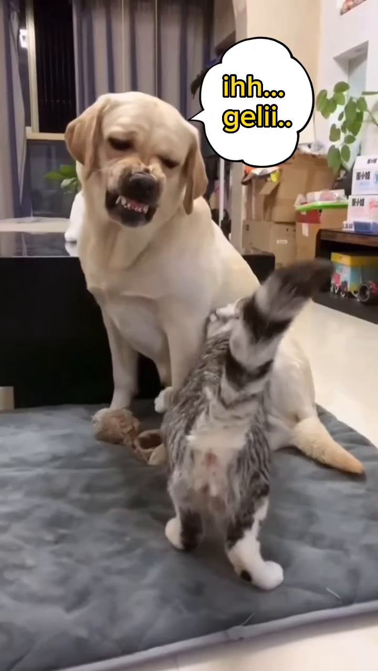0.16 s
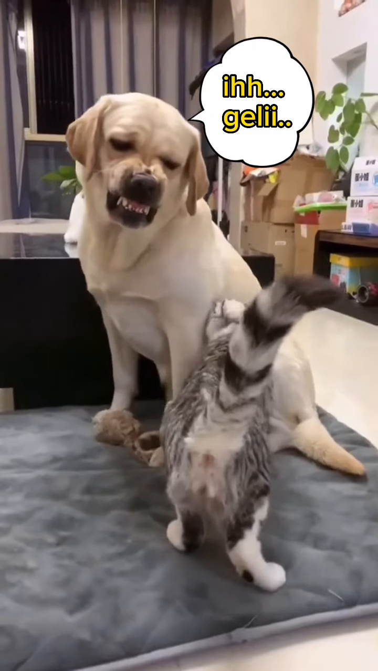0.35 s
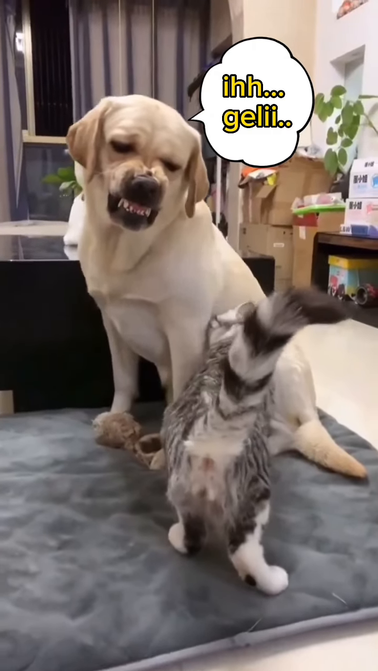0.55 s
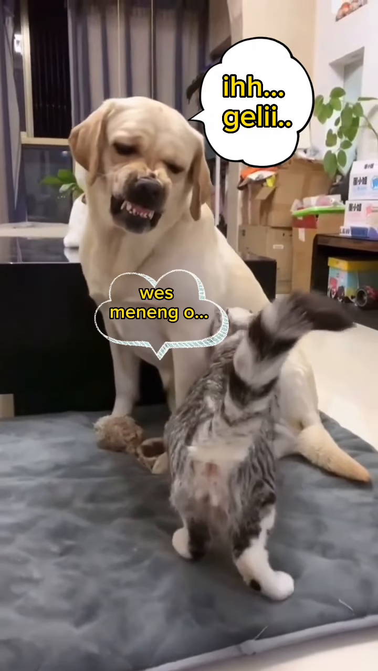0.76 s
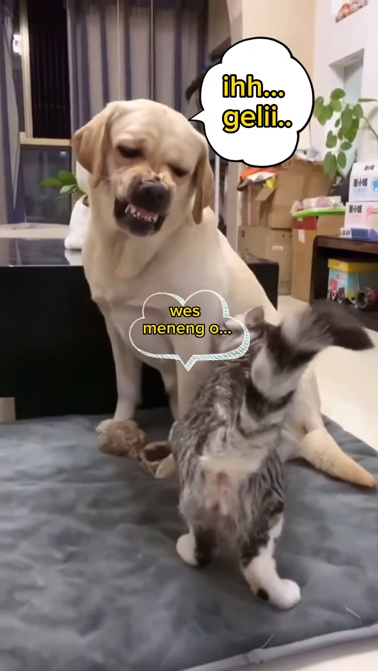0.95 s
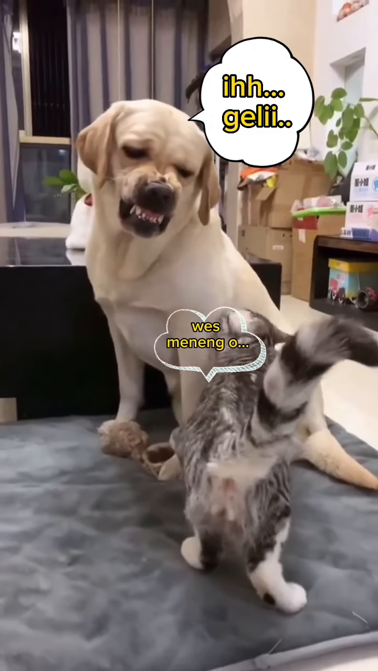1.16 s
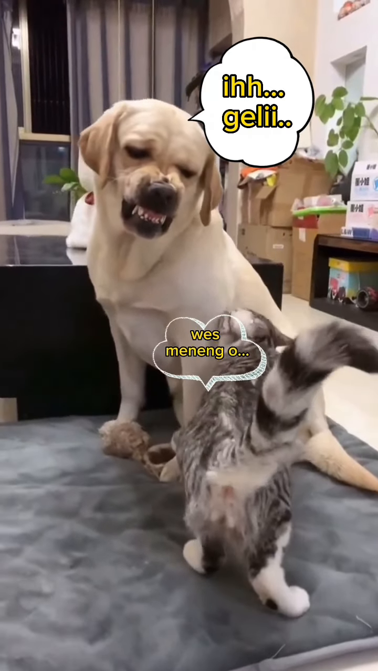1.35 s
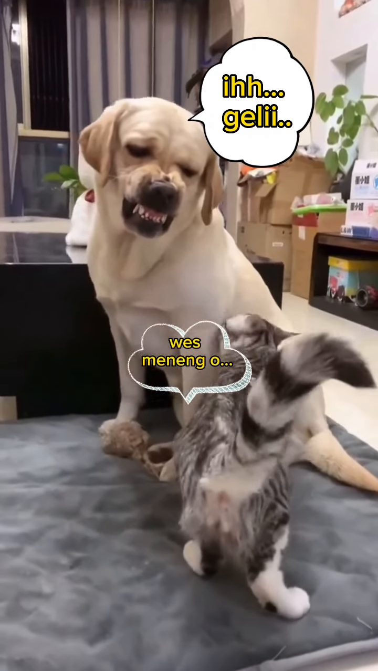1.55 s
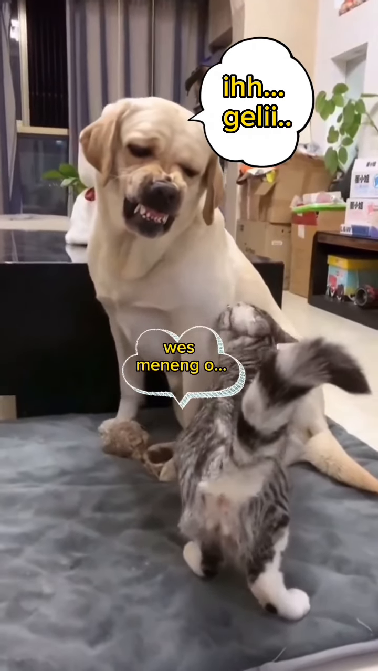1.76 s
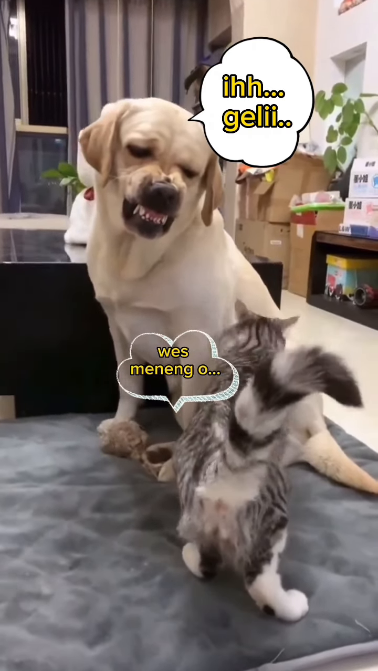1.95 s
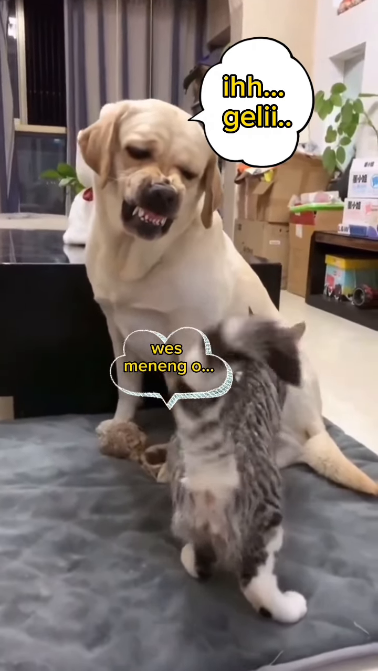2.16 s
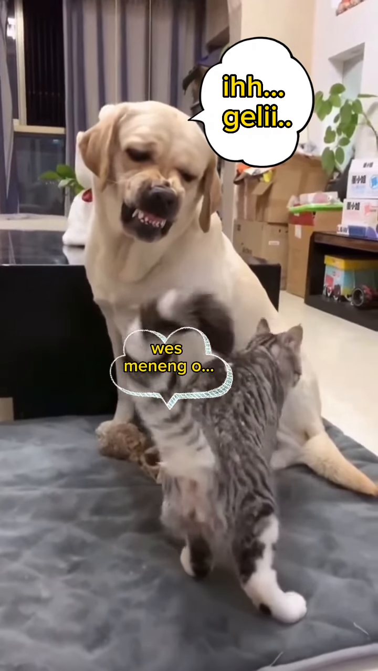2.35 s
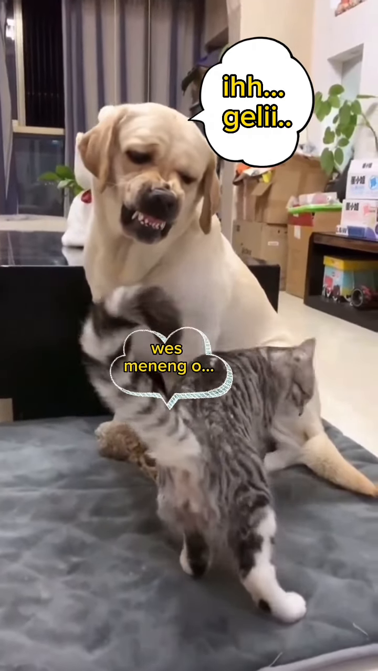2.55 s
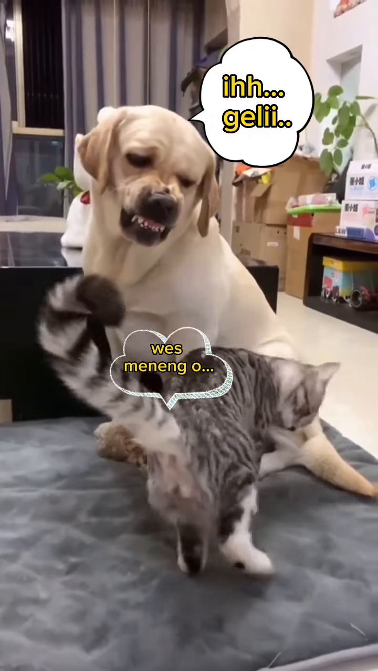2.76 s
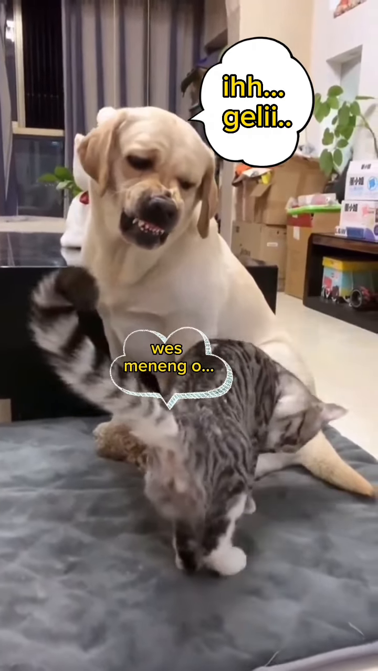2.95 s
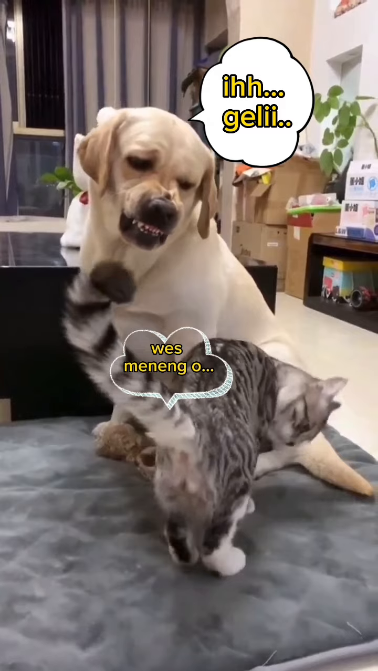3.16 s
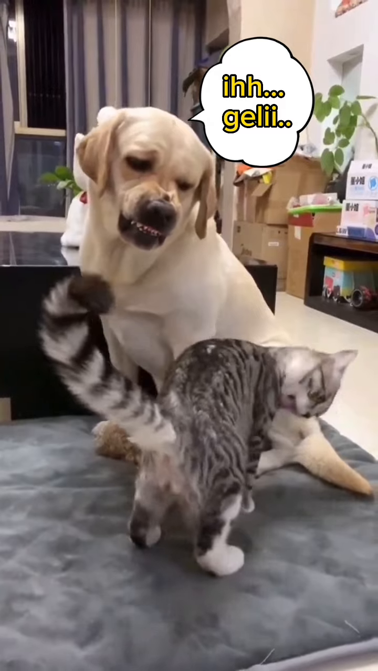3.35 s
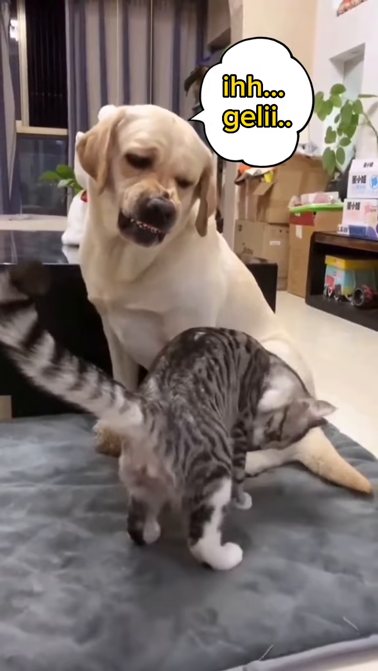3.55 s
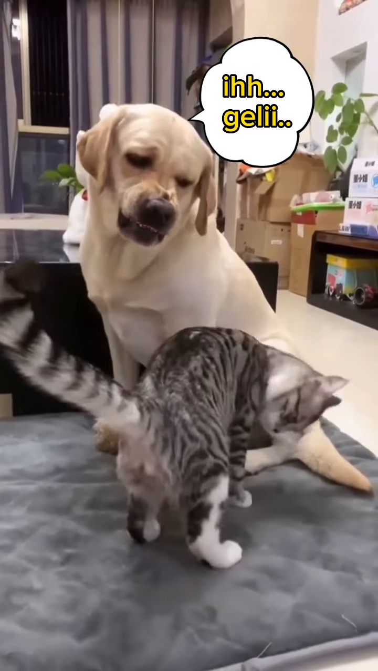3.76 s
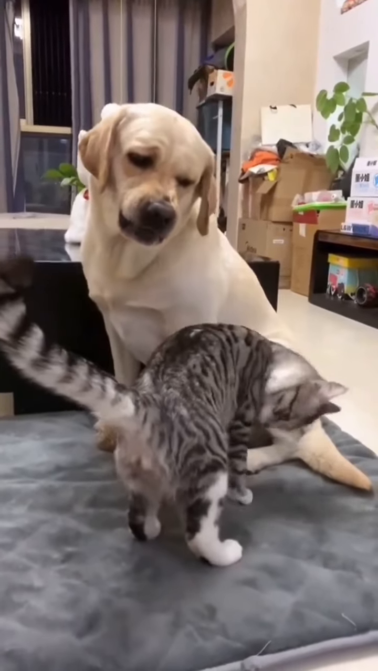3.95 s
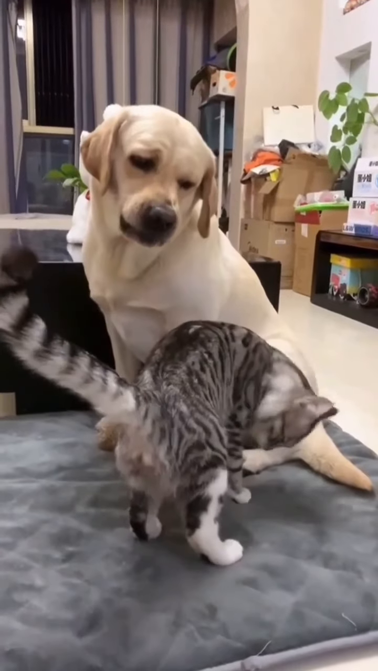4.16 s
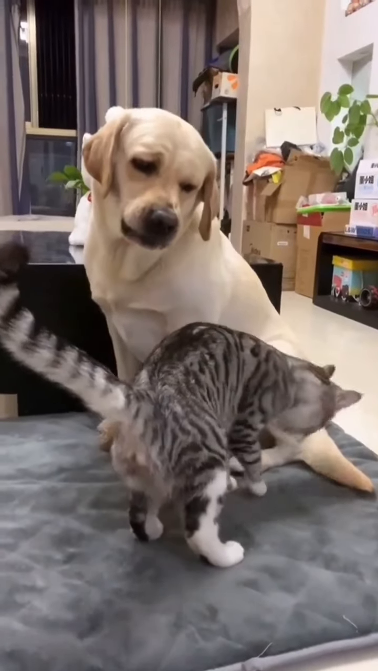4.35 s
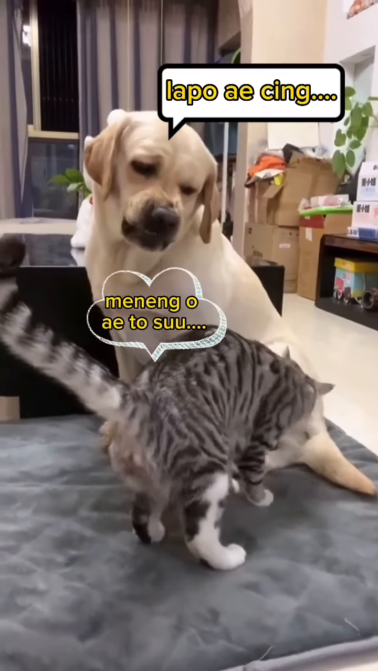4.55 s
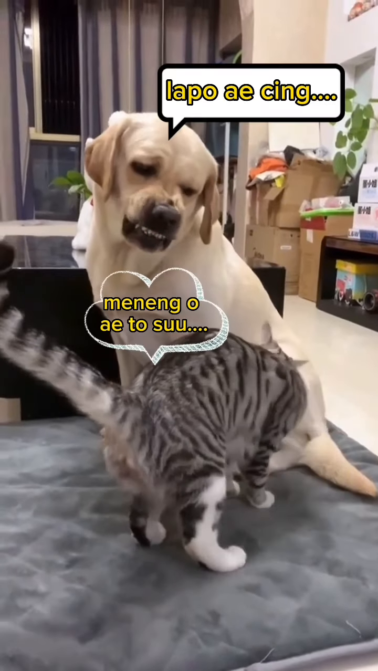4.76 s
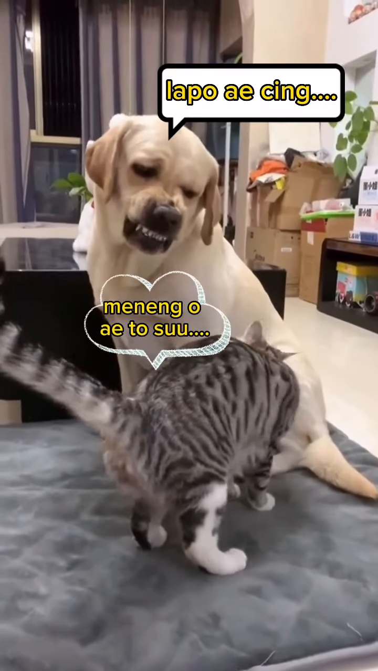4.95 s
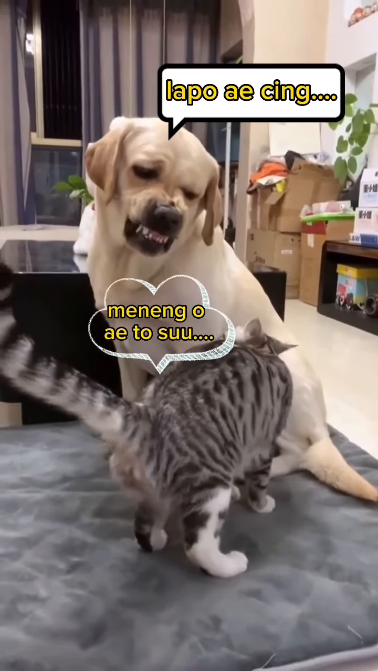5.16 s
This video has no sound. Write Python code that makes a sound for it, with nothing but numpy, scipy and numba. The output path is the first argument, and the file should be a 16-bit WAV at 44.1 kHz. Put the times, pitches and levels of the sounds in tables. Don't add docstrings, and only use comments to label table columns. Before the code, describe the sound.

A large dog sits close to a phone in a soft, dry living room. After a short snort it growls in a long fluttering rumble that sinks to a slow creak, snorts in several wet breaths, then growls again, shorter. Two more snorts follow, then abrupt full silence for about half a second, and two loud snarls, the second starting with a falling whine. The cat makes no sound.

```python
import sys
import numpy as np
from scipy import signal
from scipy.io import wavfile
from scipy.ndimage import uniform_filter1d
from numba import njit

SR = 44100
rng = np.random.default_rng(int(sys.argv[2]) if len(sys.argv) > 2 else 0)


def volts(x):
    e = np.asarray(x, float) / 20
    return 10 ** e


def unload_wav(signal):
    wavfile.write(
        sys.argv[1],
        SR,
        np.round(np.clip(np.atleast_2d(signal).T, -1, 1) * 32767).astype(np.int16),
    )


N = 230142

# pitch in Hz, width in Hz, level in dB.
THROAT = [(450, 295, 0), (748, 474, -5.5), (916, 40.7, -5.5), (1279, 81, -3), (1570, 132, -10.5)]
# pitch in Hz, width in Hz, level in dB.
KNOCK = [(493, 133, 4), (727, 338, -1.5), (972, 238, -5.5), (1460, 310, -17)]
# pitch in Hz, width in Hz, level in dB.
MUZZLE = [(1922, 43, -0.5), (2232, 93, 5), (2628, 230, -7.5), (2877, 140, -4.5)]
# pitch in Hz, width in Hz, level in dB.
TEETH = [(3610, 740, 5.5), (4680, 234, 5.5), (5995, 620, 5.5), (6580, 520, -4.5), (7730, 800, 7),
         (9730, 680, -7), (13400, 2300, -2)]


def dog():
    tissue = {"rattle": (.04, .62, .9), "rumble": (.033, .15, .89), "mutter": (.05, .12, .86),
              "hum": (.015, .55, .35), "drone": (.017, .25, .3), "creak": (.008, .93, .02),
              "murmur": (.013, .8, .02), "fade": (.035, .35, .05), "snort": (.1, .1, .55),
              "snarl": (.055, .35, .4), "whine": (.03, .2, .1)}
    colour = {"rattle": (-4.5, -8.5, -27), "rumble": (-5.5, -10, -23.5), "mutter": (-11, -15.5, -27),
              "hum": (-1.5, -13.5, -28.5), "drone": (-5, -23.5, -31.5), "creak": (-12, -12, -35),
              "murmur": (-10.5, -15, -33), "fade": (-13, -24.5, -32.5), "snort": (-4, -8.5, -20.5),
              "snarl": (-3, -13, -22), "whine": (0, -12.5, -18)}
    # its lower edge in Hz, its upper edge in Hz.
    valley_hz = (298, 395)

    hz, chest_db, jaw_db, lean_db = breathing()
    jitter, snap, depth = manner(tissue)
    pipe_db, throat_db, mouth_db = manner(colour)
    throat_db = throat_db + jaw_db
    mouth_db = mouth_db + 0.86 * jaw_db
    hz = hz * np.exp(0.5 * jitter * drift(30))
    throb_db = 8.5 * np.sqrt(jitter) * drift(35) - lean_db

    fold, flap, air = folds_and_palate(hz, jitter, depth)
    chest, pipe = chest_and_windpipe(fold, flap, jitter, valley_hz[0])
    throat = throat_sound(fold, flap, air, snap, depth, valley_hz[1])
    mouth = mouth_sound(fold, flap, air, jitter, snap, depth)

    body = volts(throb_db) * even(chest) + volts(pipe_db - throb_db) * even(pipe)
    upper = volts(throat_db) * even(throat) + volts(mouth_db) * mouth
    return volts(chest_db) * (body + upper)


def breathing():
    # time in seconds, fold rate in Hz, effort in dB, jaw opening in dB.
    growl_a = [
        (0.101, 133.3, -17.5, -12),
        (0.15, 136.5, -11.5, 0.5),
        (0.301, 141.8, -13, 2.5),
        (0.5, 118.2, -12, -2),
        (0.741, 98.8, -15, -4.5),
        (1.05, 88, -18, -0.5),
        (1.268, 68.47, -24, -0.5),
        (1.392, 70.4, -21.5, -1),
        (1.641, 59.12, -34, 1),
    ]
    # time in seconds, fold rate in Hz, effort in dB, jaw opening in dB.
    growl_b = [
        (2.258, 102.9, -26.5, -13.5),
        (2.31, 110.3, -11, -2.5),
        (2.409, 125, -13, -4),
        (2.582, 118.8, -15, 2),
        (2.67, 103.8, -15, 3),
        (2.819, 98.4, -20, 9),
        (2.971, 70.74, -24, 6),
        (3.08, 71.85, -22.5, 5),
        (3.41, 61, -26.5, -2),
    ]
    # time in seconds, fold rate in Hz, effort in dB, jaw in dB, lean to windpipe in dB.
    snarl_a = [
        (4.5, 245, -28, 2.5, 7),
        (4.54, 140.2, -16.5, -8, -3.5),
        (4.575, 125, -2.5, -4, 2.5),
        (4.62, 127.9, -13, 7, 2.5),
        (4.665, 154.9, -10.5, 2.5, -2.5),
        (4.7, 125, -20.5, 5, -1.5),
        (4.745, 169, -25, 3, -7.5),
    ]
    # time in seconds, fold rate in Hz, effort in dB, jaw in dB, lean to windpipe in dB.
    snarl_b = [
        (4.766, 251.5, -26.5, 1.5, -7),
        (4.81, 195.9, -13, -7.5, 2.5),
        (4.845, 157.6, -16.5, -3.5, -3),
        (4.867, 141.3, -7, -1, -2),
        (4.898, 127.7, -7, 1.5, 4.5),
        (4.95, 116.5, -9.5, 1, -1.5),
        (4.99, 149.8, -11.5, 3, -3.5),
        (5.138, 116.7, -17.5, 5, -3),
        (5.199, 149.9, -7.5, 4, -2.5),
    ]
    # start in seconds, rise in seconds, length in seconds, effort in dB, rate in Hz.
    snorts = [
        (-0.03, 0.044, 0.091, -16.5, 132),
        (1.691, 0.037, 0.17, -12.5, 120),
        (1.89, 0.095, 0.2, -12.5, 112),
        (2.098, 0.068, .095, -21.5, 124),
        (3.475, .04, 0.1847, -15, 117),
        (3.674, 0.049, .3, -18, 122),
    ]
    gap_db = -27
    sink_db = 5

    rows = [(*row, 0) for row in growl_a + growl_b] + snarl_a + snarl_b
    for s, rise_s, length_s, db, hz in snorts:
        fall_s = min(0.098, length_s - rise_s - .01)
        rows.append((s, hz, gap_db, 1.5, sink_db))
        rows.append((s + rise_s, hz, db, 0, 0))
        rows.append((s + length_s - fall_s, hz, db, 0, -sink_db / 2))
        rows.append((s + length_s, hz, gap_db, -0.5, 0))
    return controls(sorted(rows))


def manner(table):
    # start in seconds, name of the manner.
    phrases = [(0, "snort"), (0.107, "rattle"), (.49, "rumble"), (1.009, "mutter"), (1.26, "fade"),
               (1.34, "creak"), (1.49, "murmur"), (1.57, "fade"), (1.69, "snort"), (2.27, "rattle"),
               (2.441, "hum"), (2.62, "drone"), (2.861, "fade"), (2.982, "creak"), (3.24, "murmur"),
               (3.39, "fade"), (3.484, "snort"), (4.2, "snarl"), (4.76, "whine"), (4.854, "snarl")]
    starts, names = zip(*phrases)
    now = np.searchsorted(starts[1:], np.arange(N) / SR)
    values = np.array([table[name] for name in names], float).T
    blend_s = 0.029
    return uniform_filter1d(values[:, now], int(blend_s * SR))


def folds_and_palate(hz, jitter, depth):
    luck = rng.standard_normal((N // 100, 3)).T.copy()
    fold, fold_phase, k = cycles(hz, jitter, luck[0])
    waver = 30 * uniform_filter1d(uniform_filter1d(rng.standard_normal(N), 900), 900)
    steady_count = palate()
    count = np.maximum.accumulate(steady_count + 15 * jitter ** 2 * waver)
    j, flap_phase = count.astype(int), count % 1
    choke = 1 - .5 * depth * np.cos(2 * np.pi * flap_phase)
    fold = fold * volts(20 * jitter * luck[1][k]) * choke
    flap = np.diff(j, prepend=j[0]) * depth * volts(3.5 * luck[2][j])
    since_s = flap_phase / np.gradient(steady_count) / SR
    reopening = .8 * np.exp(-((since_s - .0105) / .0038) ** 2) * volts(2.2 * luck[2][j + 1])
    puff = reopening + .7 * np.exp(-since_s / .002)
    air = (1 - depth + 1.35 * depth * puff) * (1.24 + np.exp(-fold_phase / 1.8))
    return fold, flap, air


@njit
def cycles(hz, jitter, chance):
    pulses, phase, count = np.zeros(len(hz) + 1), np.empty(len(hz)), np.empty(len(hz), np.int64)
    p, k = 0., 0
    for i in range(len(hz)):
        step = hz[i] * np.exp(jitter[i] * chance[k]) / SR
        p += step
        if p >= 1:
            p, k = p - 1, k + 1
            pulses[i] += p / step
            pulses[i + 1] += 1 - p / step
        phase[i], count[i] = p, k
    return pulses[:-1], phase, count


def palate():
    # start in seconds, flaps per second.
    runs = [
        (0, 33.6),
        (.119, 33.8),
        (.3822, 37),
        (.5698, 34),
        (.954, 33.3),
        (1.224, 41),
        (2.291, 27),
        (2.44, 62),
        (2.6, 40),
        (5.3, 40),
    ]
    s, rate = np.transpose(runs)
    flaps = np.round(rate[:-1] * np.diff(s))
    return np.interp(np.arange(N) / SR, s, np.cumsum(np.r_[0, flaps]))


def chest_and_windpipe(fold, flap, jitter, top_hz):
    # pitch in Hz, width in Hz, level in dB.
    chest = [(84.3, 22.7, -0.5), (125, 37.8, 6.5)]
    # pitch in Hz, width in Hz, level in dB.
    windpipe = [(226.6, 39.1, 2.57), (242.2, 47.1, 1.5)]
    eddies = (0.0079 + 0.66 * jitter) * rng.standard_normal(N)
    low = fold + .5 * flap + eddies
    low = edge(edge(low, top_hz, "low"), top_hz, "low")
    return tract(low, chest, twice=True), tract(low, windpipe, twice=True)


def throat_sound(fold, flap, air, snap, depth, bottom_hz):
    rush = air * rng.standard_normal(N)
    throat = tract(.85 * (1 - snap) * rush, THROAT) - tract(12 * snap * fold + 17 * flap, KNOCK)
    tick = band(flap * depth * (1 - snap), 1600, 2010)
    tick = volts(9) * edge(edge(tick, 2520, "low"), 3000, "low")
    return edge(throat - tick, bottom_hz, "high")


def mouth_sound(fold, flap, air, jitter, snap, depth):
    rush = air * rng.standard_normal(N)
    muzzle = tract(1.3 * (1 - 0.54 * snap) * rush - 9 * snap * fold - 20 * flap, MUZZLE, twice=True)
    flow = (0.45 + uniform_filter1d(air, int(0.0013 * SR))) ** 0.29
    teeth = tract(flow * volts(2.3 * drift(40)) * rng.standard_normal(N), TEETH, twice=True)
    teeth_db = -7.0 + 62.0 * jitter + 0.61 * snap - 3.26 * depth
    return volts(-1.5) * even(muzzle) + volts(teeth_db) * even(teeth)


def slaps():
    # time in seconds, peak level in dB.
    snaps = [(0.044, -5), (0.119, -4.5), (1.347, -16.5), (1.717, -1), (1.983, -3), (2.005, -1),
             (2.025, -4.5), (2.291, -7.5), (2.336, -3.5), (2.369, -8), (3.504, -3), (3.563, -0.5),
             (3.732, -6.5), (3.824, -2.5), (3.85, -19.5), (4.639, 6), (4.662, 4.5), (4.855, -4),
             (4.884, -4), (4.953, -2)]
    hits = np.zeros(N)
    for s, db in snaps:
        hits[int(s * SR)] = volts(db)
    crack = rng.standard_normal(300) * np.exp(-np.arange(300) / 150.0)
    knock = 6 * hits + np.convolve(hits, crack)[:N]
    throat = -volts(7.0) * tract(knock, KNOCK) + volts(6) * tract(knock, THROAT[2:])
    return throat - volts(-12.5) * tract(knock, MUZZLE) + volts(-31) * tract(knock, TEETH)


def nostril():
    # start in seconds, length in seconds, first pitch in Hz, last pitch in Hz, level in dB.
    whistles = [
        (4.517, 0.084, 1033, 986, -33),
        (4.767, .14, 1104, 728, -31.5),
    ]
    edge_s = 0.021
    t, out = np.arange(N) / SR, 0
    flutter = even(edge(rng.standard_normal(N), 45, "low"))
    for s, length_s, from_hz, to_hz, db in whistles:
        hz = np.interp(t, [s, s + length_s], [from_hz, to_hz])
        swell = np.clip(np.minimum(t - s, s + length_s - t) / edge_s, 0, 1) ** 2
        tone = np.sqrt(2) * np.cos(2 * np.pi * np.cumsum(hz) / SR)
        out = out + volts(db) * swell * flutter * tone
    return out


def room(x):
    t60_s, tail_db = .12, -15
    t = np.arange(int(.2 * SR)) / SR
    tail = rng.standard_normal(len(t)) * volts(-60 * t / t60_s) * (t > .004)
    tail = tail / np.sqrt(np.sum(tail ** 2))
    tail = signal.lfilter(*signal.butter(2, 400, "high", fs=SR), tail)
    return x + volts(tail_db) * signal.fftconvolve(x, tail)[:N]


def microphone_hiss():
    return volts(-63) * edge(rng.standard_normal(N), 9000, "high")


def band(x, hz, width):
    return signal.lfilter(*signal.iirpeak(hz, hz / width, fs=SR), x)


def tract(x, modes, twice=False):
    out = 0
    for k, (hz, width, db) in enumerate(modes):
        if twice:
            ring = band(band(x, hz, 2.21 * width), hz, 2.21 * width)
        else:
            ring = band(x, hz, width)
        out = out + (-1) ** k * volts(db) * ring
    return out


def edge(x, hz, kind):
    return signal.sosfilt(signal.butter(4, hz, kind, fs=SR, output="sos"), x)


def even(x, span_s=.09):
    k = int(span_s * SR)
    return x / np.sqrt(uniform_filter1d(uniform_filter1d(x ** 2, k), k) + 1e-18)


def drift(rate_hz):
    k = int(SR / rate_hz)
    return even(uniform_filter1d(uniform_filter1d(rng.standard_normal(N), k), k), 0.95)


def controls(rows):
    s, *columns = np.transpose(rows)
    return [np.interp(np.arange(N) / SR, s, c) for c in columns]


def scene():
    return (room(dog() + slaps() + nostril()) + microphone_hiss())[None]


def top_cut(x):
    return signal.sosfilt(signal.butter(12, 15670, fs=SR, output="sos"), x)


def record(dry):
    # its start in seconds, its end in seconds.
    pause_s = (3.9, 4.5)
    t = np.arange(N) / SR
    on = (t < pause_s[0]) | (t > pause_s[1])
    rounded = np.tanh(0.84 * edge(dry, 59, "high")) / 0.86
    mix = np.clip(rounded, -1, 1) * uniform_filter1d(1. * on, 40)
    return top_cut(mix)


dry = scene()
out = record(dry)
unload_wav(out)
```